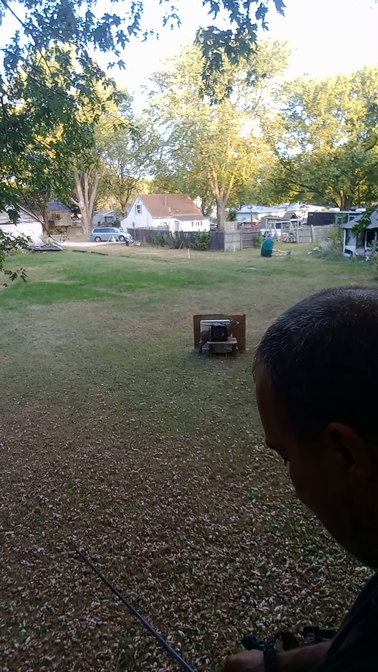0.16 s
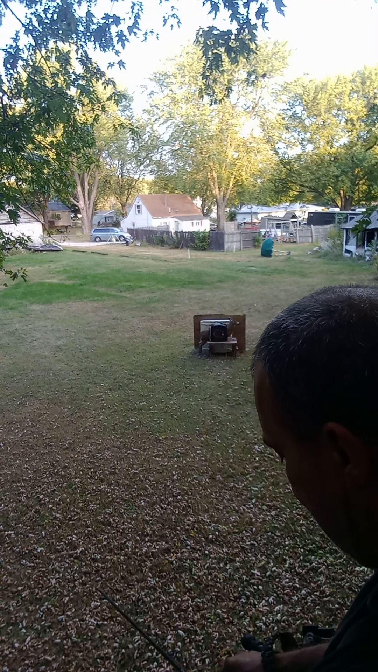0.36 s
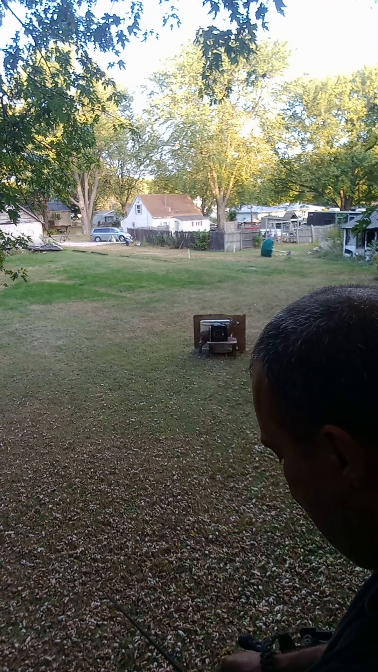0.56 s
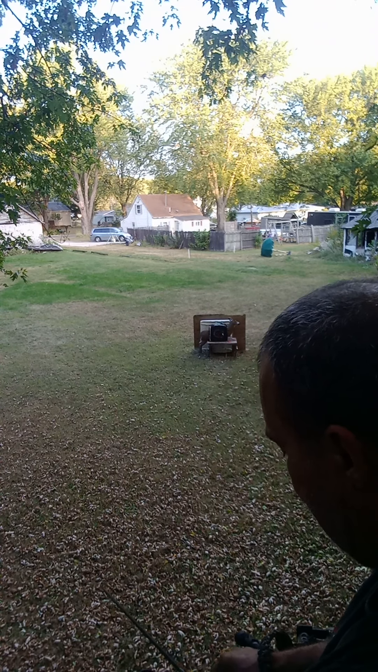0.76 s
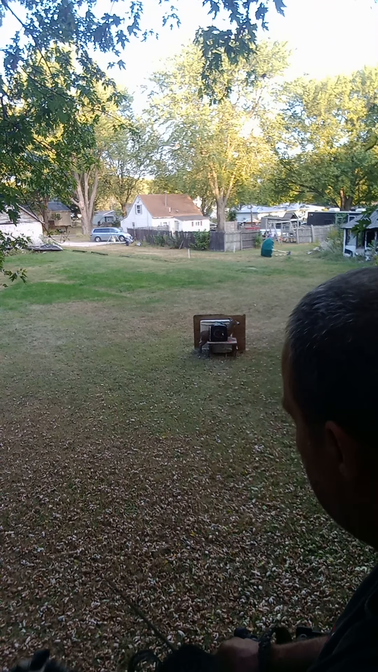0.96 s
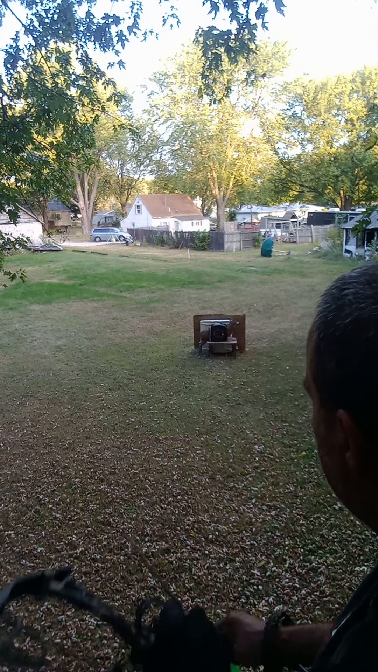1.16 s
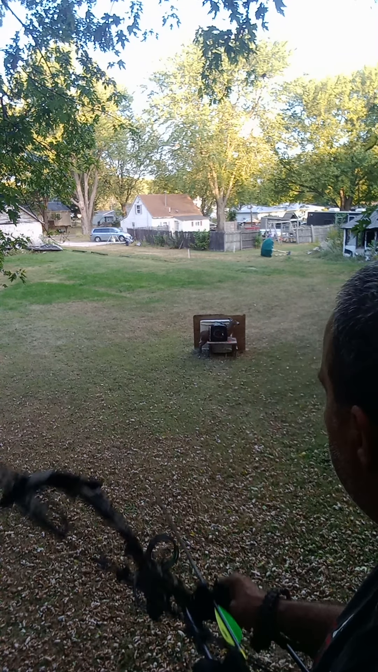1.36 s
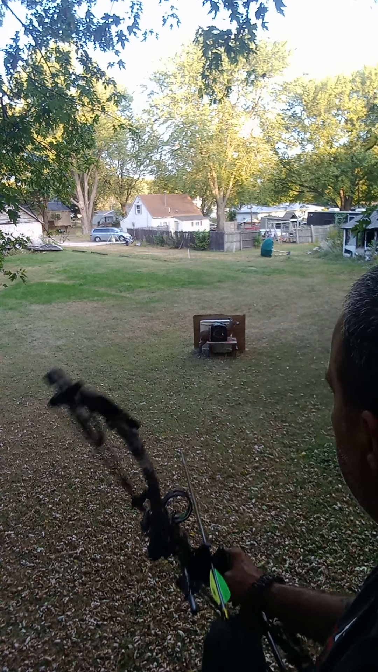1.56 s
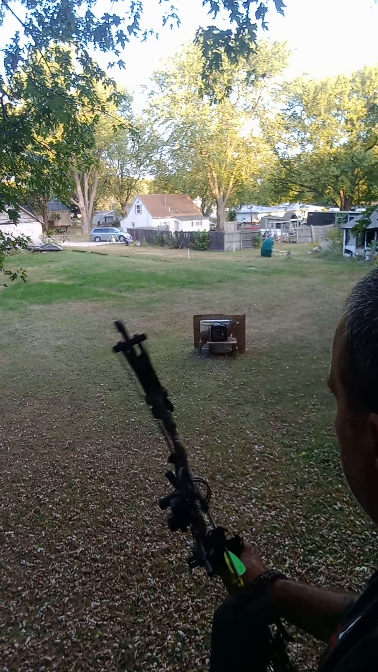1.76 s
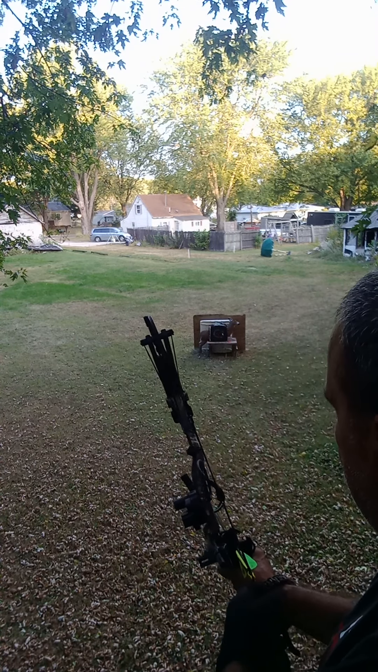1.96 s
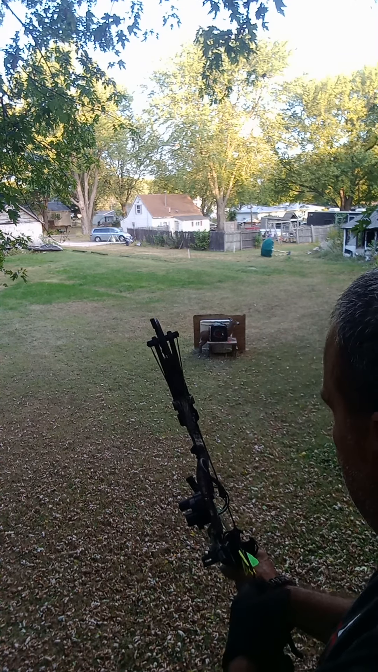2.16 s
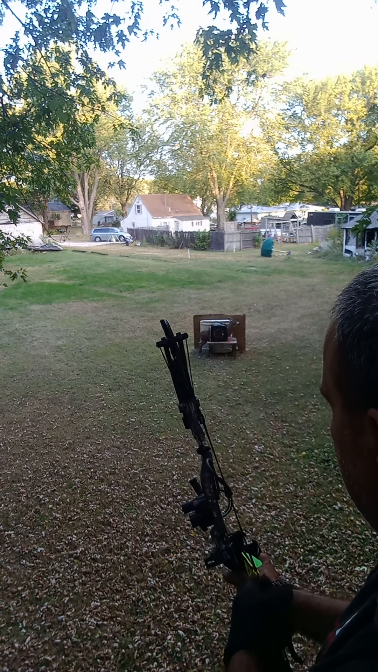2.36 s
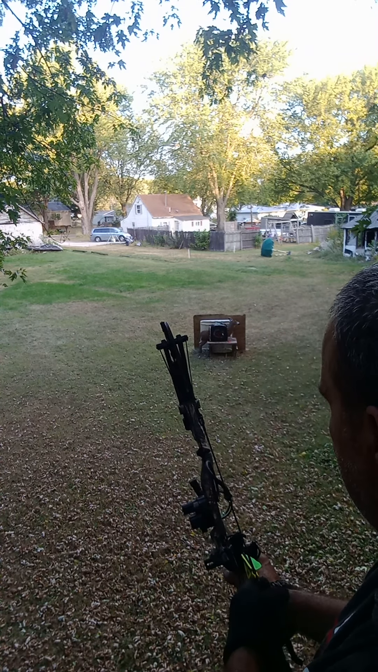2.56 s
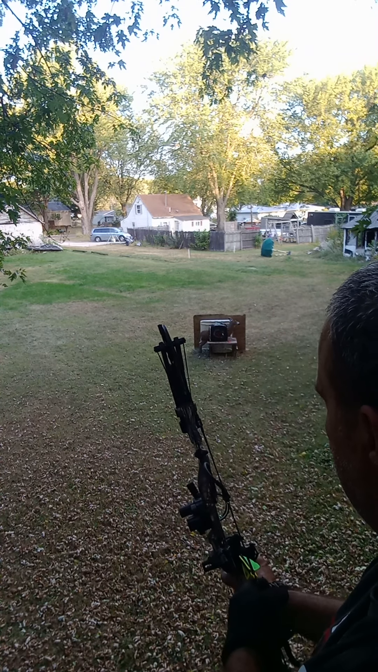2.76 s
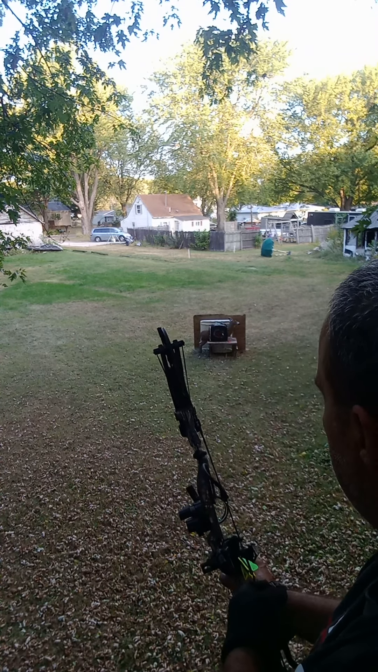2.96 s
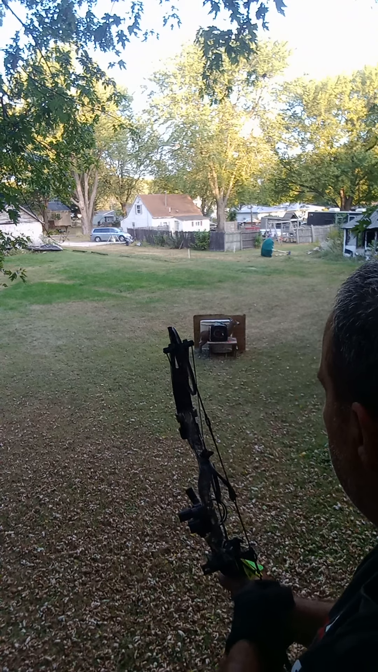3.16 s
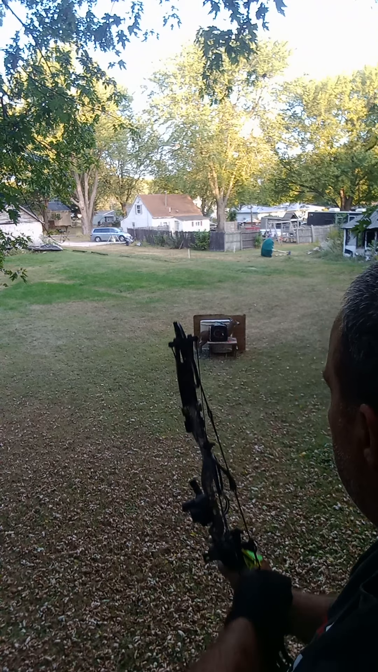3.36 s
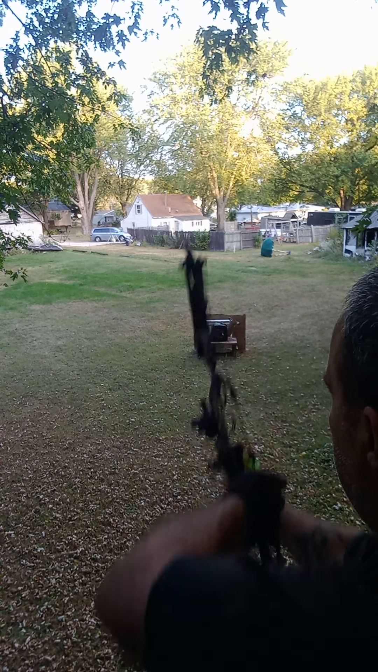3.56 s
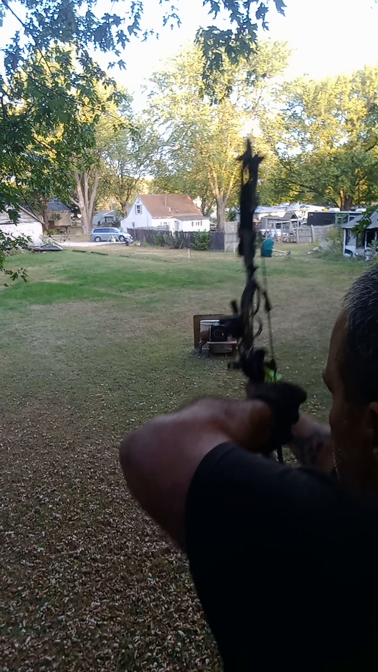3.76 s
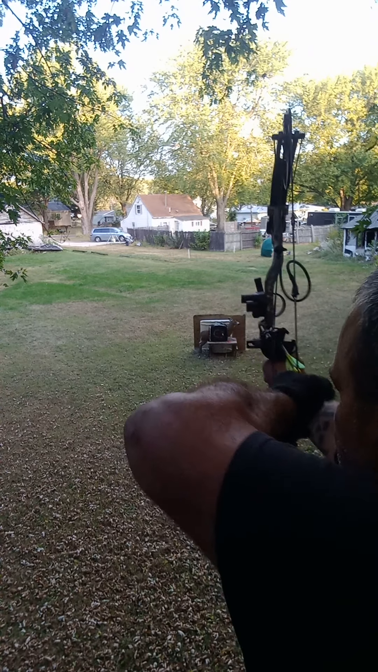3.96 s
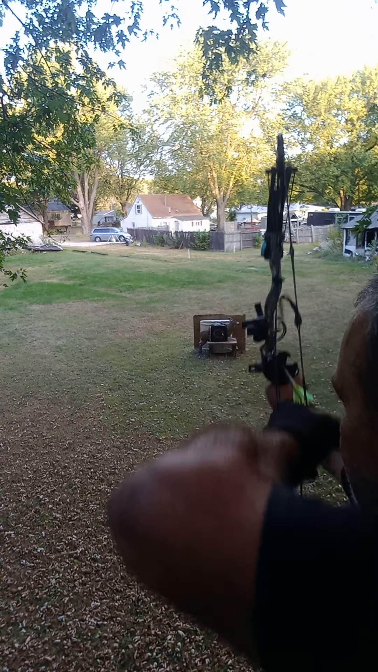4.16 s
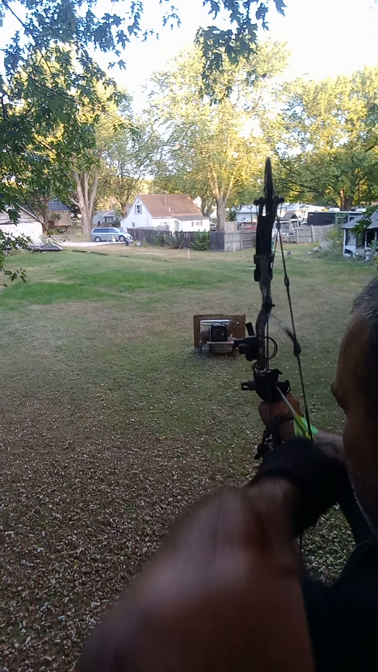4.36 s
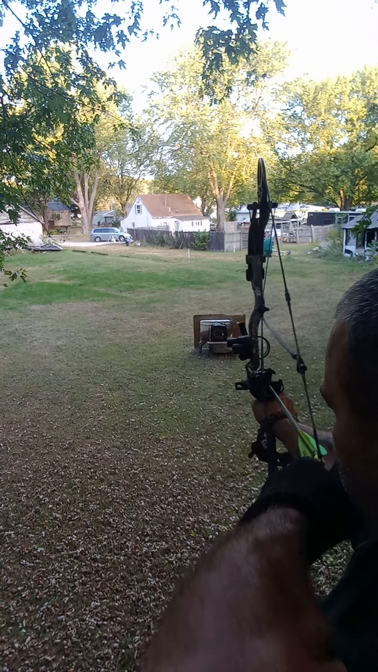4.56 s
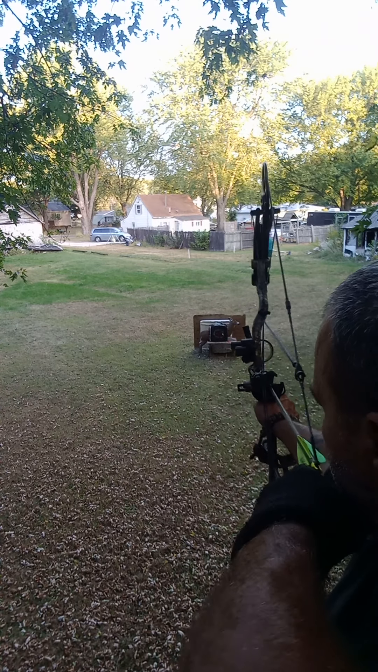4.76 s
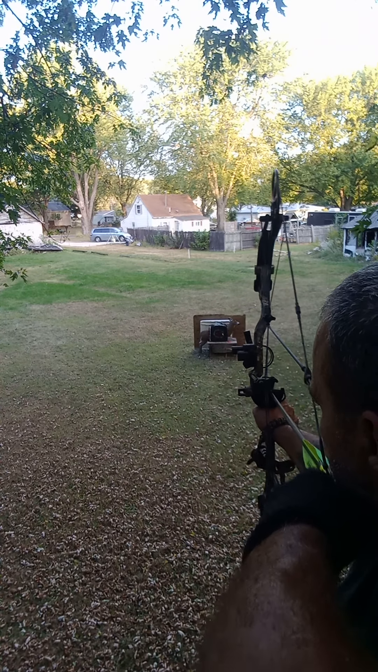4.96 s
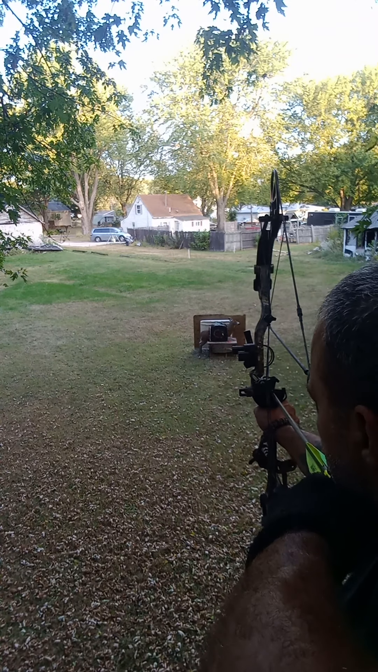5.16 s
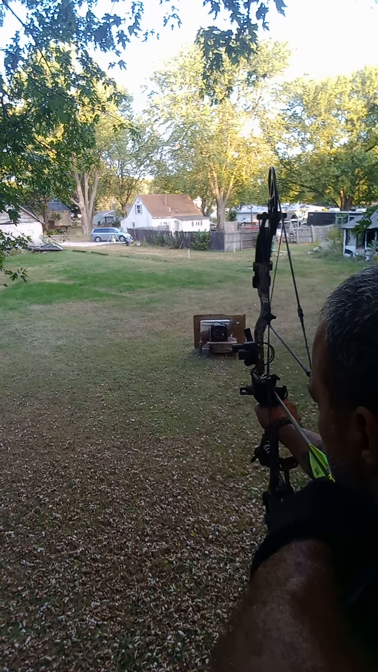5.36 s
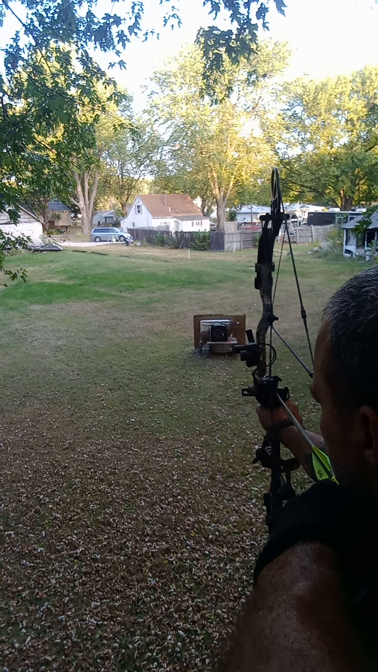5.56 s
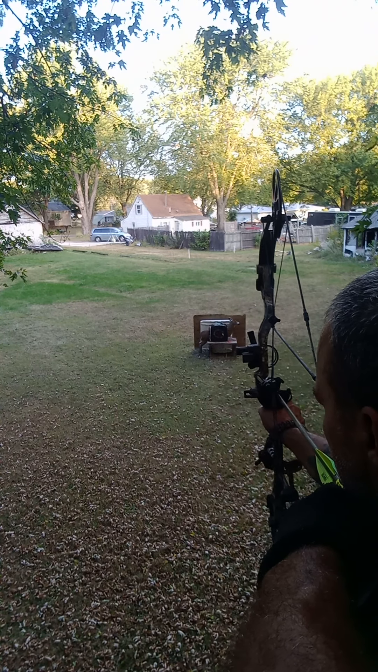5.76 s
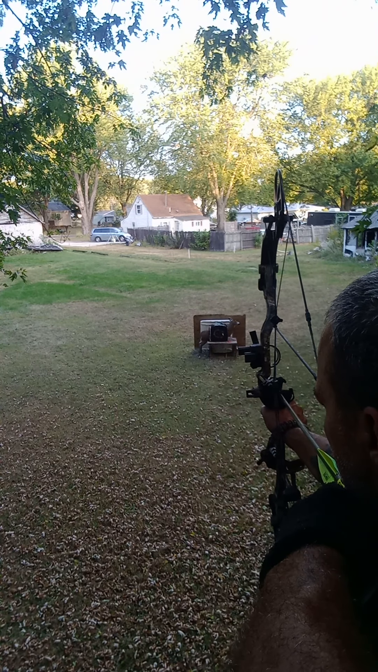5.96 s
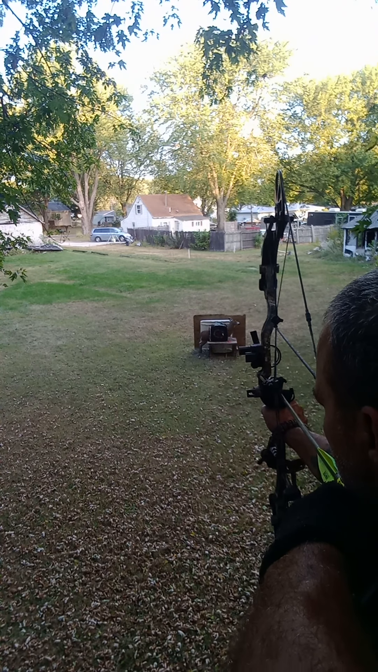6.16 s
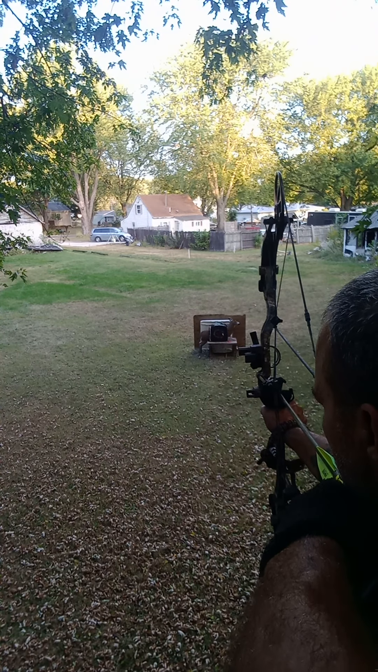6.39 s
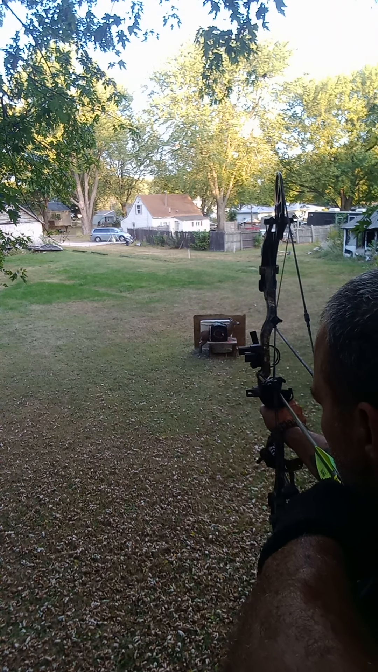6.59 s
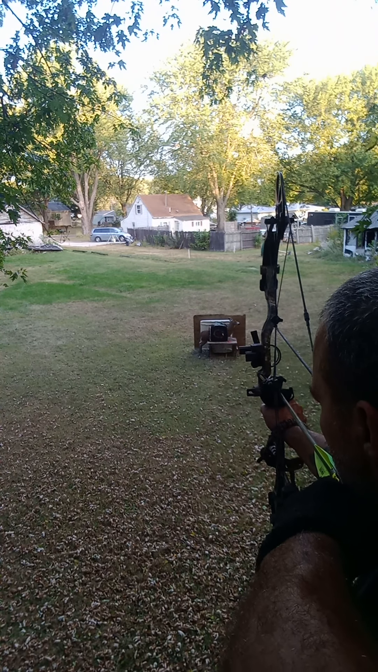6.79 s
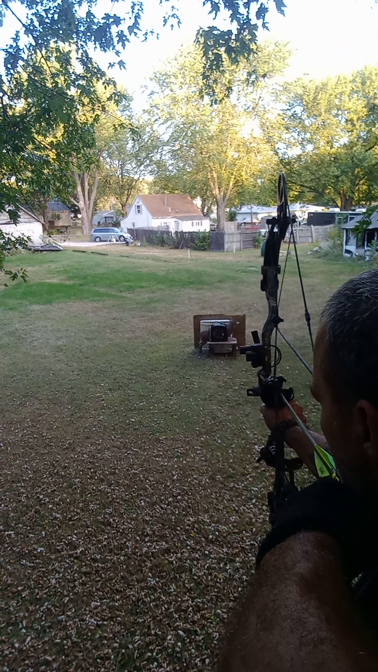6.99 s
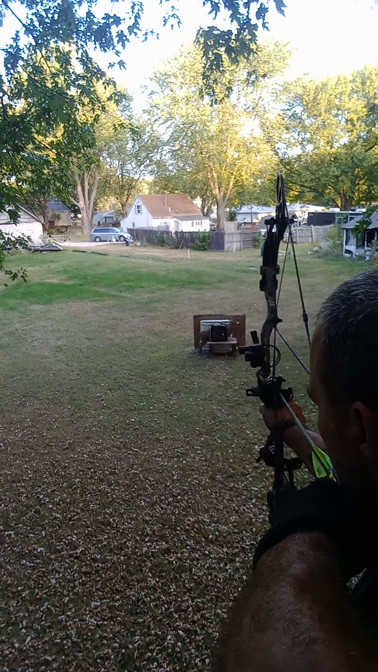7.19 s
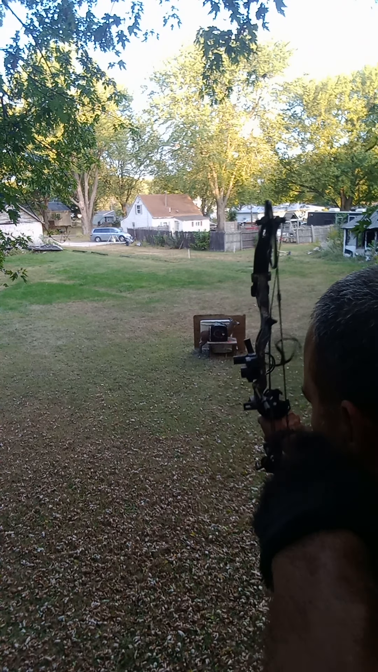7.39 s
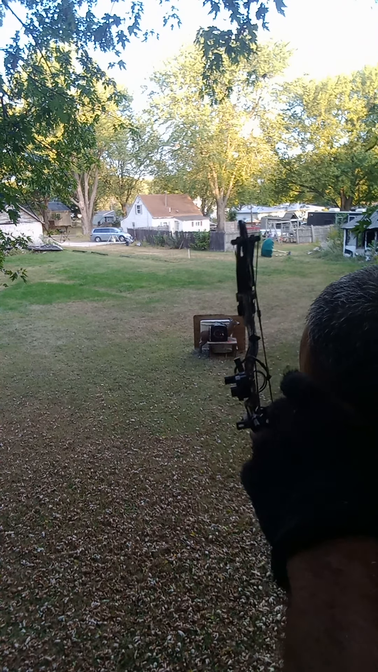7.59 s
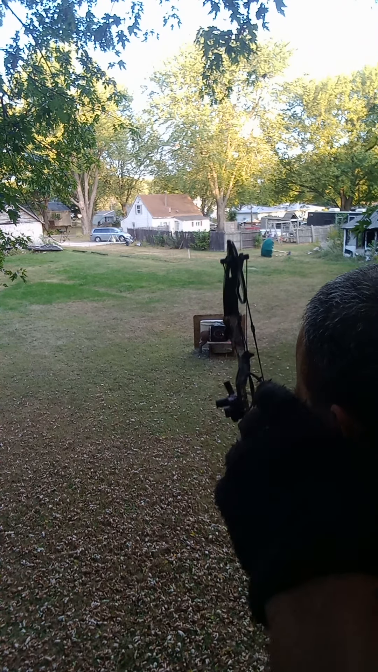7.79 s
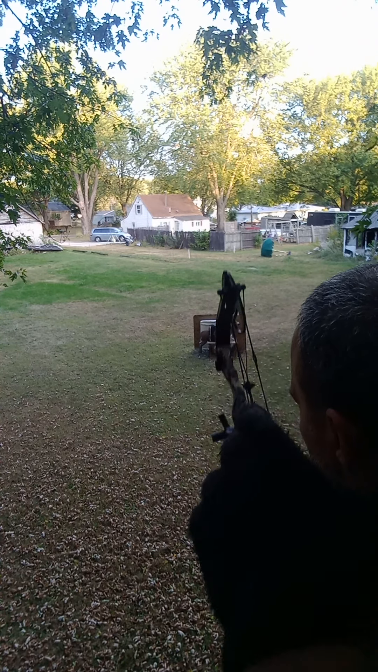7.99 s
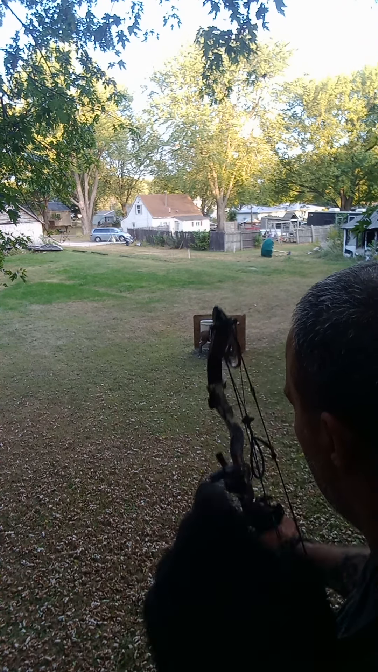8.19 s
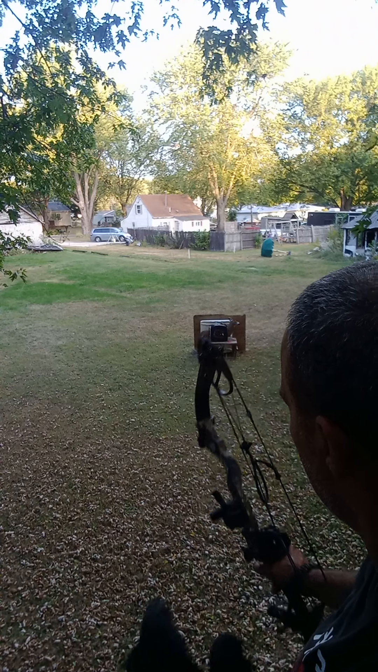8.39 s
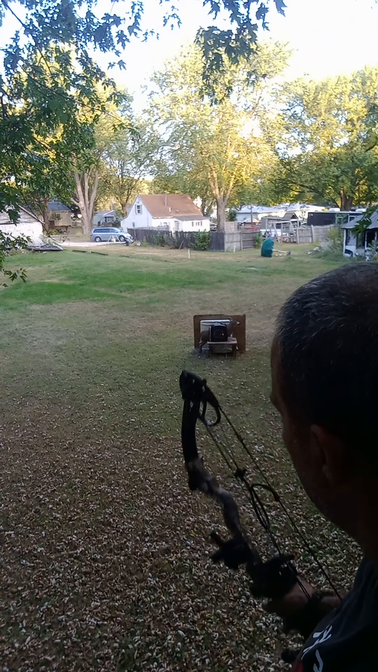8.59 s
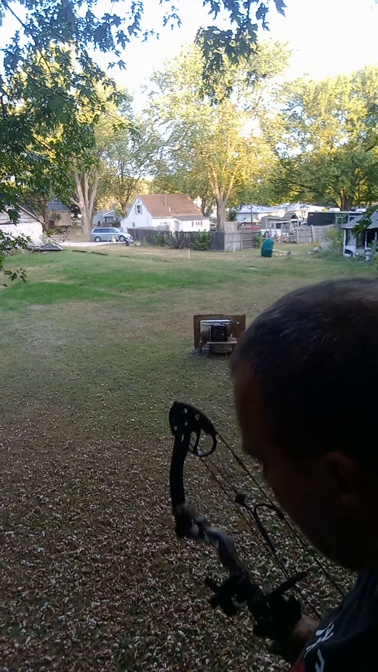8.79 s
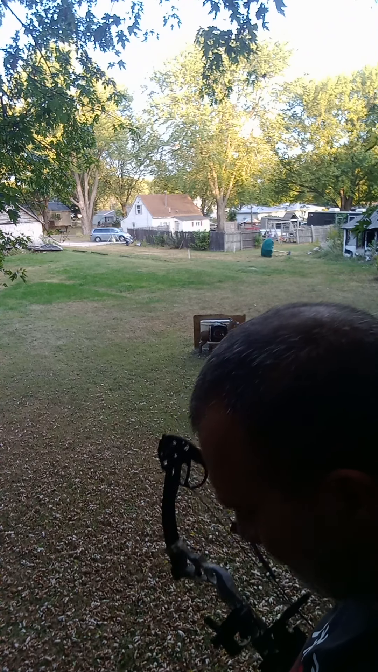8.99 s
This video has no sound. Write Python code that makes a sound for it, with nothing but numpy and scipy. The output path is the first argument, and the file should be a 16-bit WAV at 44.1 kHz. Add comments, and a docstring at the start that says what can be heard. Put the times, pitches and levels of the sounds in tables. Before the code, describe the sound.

Quiet backyard with far traffic, a throbbing engine drone and crickets; a bow snaps with a sharp buzzing slap, then an arrow thuds into a target.

```python
"""Far traffic, a throbbing engine drone and crickets open the scene and carry on beneath it: shaped noise and tones.
A faint rustle and a low rub, swells of noise, come before a compound bow is shot in a back yard: the string
whips forward, slaps its stop and leaves the bow buzzing, as noise bursts and damped modes.
A quarter of a second later the arrow thuds into a boxed target, more modes and noise; trees and houses answer
with quick echoes and decaying noise. Loud peaks turn the camera's gain down, and it stays down."""
import sys
import numpy as np
from scipy import signal
from scipy.fft import rfft, irfft, next_fast_len
from scipy.io import wavfile
from scipy.ndimage import uniform_filter1d, map_coordinates

SR = 44100
rng = np.random.default_rng(int(sys.argv[2]) if len(sys.argv) > 2 else 0)


def put_to_file(sound):
    """Save the sound as 16-bit audio at rate SR, in the file named by the first command-line argument."""
    columns = np.atleast_2d(sound).T  # one column per channel
    safe = np.clip(columns, -1, 1)
    whole_steps = np.round(safe * 32767)
    wavfile.write(sys.argv[1], SR, whole_steps.astype(np.int16))


N = 398663


def amp(db):
    """Decibels as an amplitude factor."""
    return 10 ** (np.asarray(db) / 20)


def unit(x):
    """x at rms 1."""
    return x / np.sqrt(np.mean(x ** 2) + 1e-20)


def along(points, hz):
    """A curve through (f/Hz, value) points, read on a log frequency axis."""
    f, v = np.transpose(points)
    return np.interp(np.log(hz + 1), np.log(f + 1), v)


def clock():
    """The time of each sample in seconds."""
    return np.arange(N) / SR


def curves(rows):
    """One value per sample for each column after the time."""
    s, *cols = np.transpose(rows)
    return [np.interp(clock(), s, c) for c in cols]


def wobble(rate):
    """A smooth random curve, rate knots a second."""
    knots = rng.standard_normal(int(N * rate / SR) + 4)
    return map_coordinates(knots, [clock() * rate])


def swell(middle, spread):
    """A bell-shaped rise and fall in time; spread is the bell's standard deviation in seconds."""
    return np.exp(-.5 * ((clock() - middle) / spread) ** 2)


def filtered(x, response):
    """x with its spectrum multiplied by a response of frequency."""
    m = next_fast_len(N + 8192)
    hz = np.fft.rfftfreq(m, 1 / SR)
    return irfft(rfft(x, m) * response(hz), m)[..., :N]


def panned(x, pan_db):
    """x leaning left by pan_db; a negative value leans right."""
    return x * amp([[pan_db / 2], [-pan_db / 2]])


def noise(colour, width, pan):
    """Stereo noise whose middle has rms 1, with a spectrum, a width and a balance."""
    def mid_and_side(hz):
        mid_db = along(colour, hz)
        return amp([mid_db, mid_db + along(width, hz)])

    mid, side = filtered(rng.standard_normal((2, N)), mid_and_side)
    left_right = np.array([mid + side, mid - side])
    pair = filtered(left_right, lambda hz: amp(np.outer([.5, -.5], along(pan, hz))))
    return pair / np.std(pair.mean(axis=0))


def fade(start, t60, rise):
    """The envelope of one blow: a quick rise and an exponential decay."""
    t = np.maximum(clock() - start, 0)
    return np.exp(-np.log(1000) * t / t60) * (1 - np.exp(-t / rise))


def ring(modes, start, scatter_db, rise):
    """Damped modes struck at start, each at a slightly random strength."""
    t = np.arange(SR // 2) / SR
    hz, db, t60 = np.transpose(modes)[:, :, None]
    strength = amp(db + scatter_db * rng.standard_normal(db.shape))
    partials = strength * np.exp(-np.log(1000) * t / t60) * np.sin(2 * np.pi * hz * t)
    struck = partials.sum(axis=0) * (1 - np.exp(-t / rise))
    return np.pad(struck, (round(start * SR), N))[:N]


def dying(x, start, decays, rise):
    """Scattered sound that builds up from start, each frequency dying at its own speed."""
    hz, t, z = signal.stft(x, SR, nperseg=256)
    t60 = along(decays, hz)[:, None]
    loss = np.exp(-np.log(1000) * np.maximum(t - start, 0) / t60)
    build_up = 1 - np.exp(-np.maximum(clock() - start, 0) / rise)
    return signal.istft(z * loss, SR, nperseg=256)[1][:, :N] * build_up


# cars passing on the far road: (middle t/s, spread t/s, rise in level/dB)
CAR_PASSES = [(.5, 0.93, 1.35), (5.95, 0.64, 2)]


def passing(lead):
    """The rise in dB as cars go by, lead seconds early."""
    return sum(db * swell(s - lead, spread) for s, spread, db in CAR_PASSES)


# spectrum of the tyres' roar: (f/Hz, relative level/dB per Hz)
ROAR_COLOUR = [(210, -30), (350, -4), (380, -12.5), (455, -6), (482, -8.5), (537, -0.5), (864, -6.5),
               (1070, -8), (1700, -19.5), (2770, -42), (3860, -46.5), (4350, -46), (6000, -43.5),
               (7800, -75), (13200, -120)]
# spectrum of the low rumble: (f/Hz, relative level/dB per Hz)
RUMBLE_COLOUR = [(22, -26), (40, -2), (60, 1), (100, 0), (150, -3.5), (300, -3), (420, -12.5), (700, -28),
                 (1500, -70)]
# stereo width of the background, heard in the rustle and rub too: (f/Hz, side minus mid level/dB)
AIR_SPREAD = [(60, -10), (110, -13.5), (200, -19.5), (380, -14.5), (700, -8.5), (1290, -3.5), (2380, -0.5),
              (4400, 1), (8120, -0.5), (15000, -0.5)]
# stereo balance of traffic and crickets: (f/Hz, left minus right level/dB)
AIR_BALANCE = [(60, -10.5), (110, -8.5), (200, -1.5), (380, -2), (700, -1), (1290, -0.5), (2380, -3.5),
               (4400, -4.5), (8120, 2.5), (15000, 0)]
ROAR_DB, ROAR_WAVERS_DB = -45.8, 0.42  # level between passes, and its unsteadiness
RUMBLE_DB, RUMBLE_FADE_DB_PER_S = -45.5, 0.35  # level at first, and how fast it recedes
RUMBLE_LEAD_S, RUMBLE_GROWS = 0.44, 1.6  # rumble comes before roar; its dB for each dB of the roar's rise


def traffic():
    """Distant roads: a low rumble under a soft roar of tyres, both swelling with each passing car."""
    roar_db = ROAR_DB + passing(0) + ROAR_WAVERS_DB * wobble(12)
    rumble_db = RUMBLE_DB - RUMBLE_FADE_DB_PER_S * clock()
    rumble_db = rumble_db + RUMBLE_GROWS * passing(RUMBLE_LEAD_S) + 0.5 * wobble(8)
    roar = amp(roar_db) * noise(ROAR_COLOUR, AIR_SPREAD, AIR_BALANCE)
    rumble = amp(rumble_db) * noise(RUMBLE_COLOUR, AIR_SPREAD, AIR_BALANCE)
    return roar + rumble


# far tyres singing: (middle t/s, spread t/s, f/Hz, level/dB before it wavers)
TYRE_NOTES = [(0.62, 0.59, 458, -52), (0.25, 0.55, 535, -50), (6.02, 0.52, 355, -54), (5.8, 0.47, 543, -48),
              (5.96, 0.71, 517, -51), (6.05, 0.57, 620, -50.5), (8.9, .35, 545, -52)]


def whines():
    """Tyres on the far road sing faint, unsteady sine notes that come and go."""
    notes = np.zeros(N)
    for s, spread, hz, db in TYRE_NOTES:
        pitch = hz * (1 + 0.00401 * wobble(3) + 0.00561 * wobble(25))
        level = amp(db + 2.1 * wobble(8)) * swell(s, spread)
        notes += level * np.sin(2 * np.pi * np.cumsum(pitch) / SR)
    return panned(notes, pan_db=-5.5)


# the far engine's drone, swelling and sinking: (t/s, level/dB before the tone's lift and the throb)
DRONE_LEVEL = [(0, -51.5), (0.4, -41), (1.35, -43), (1.7, -49.5), (2.4, -54), (3.3, -45), (4.45, -41),
               (4.8, -42), (6.2, -55.5), (6.9, -50), (8.2, -55.5)]
# rough running round the note: (f/Hz, relative level/dB per Hz)
CHURN_COLOUR = [(20, -70), (40, -30), (55, -11), (64, 5.5), (72, 5.5), (80, 4), (92, -9), (130, -35),
                (300, -120)]
HUM_HZ, HUM_DRIFT = 72.15, .005  # the note, and the share by which it wanders
CHURN_DB, CHURN_FADE_DB_PER_S = -42.5, 0.68  # level at first, before the throb, and how fast it recedes
CHURN_FOLLOWS = 0.34  # dB of churn for each dB of the drone
THROB_RATE, THROB_DEPTH = 11, .75  # random dips: knots a second, largest share of amplitude lost


def hum():
    """A far engine drones on one low note; its rough running beats against the note, and both throb."""
    level_db, = curves(DRONE_LEVEL)
    pitch = HUM_HZ * (1 + HUM_DRIFT * wobble(1.98))
    tone = amp(level_db + 3.5) * unit(np.sin(2 * np.pi * np.cumsum(pitch) / SR))
    churn_db = CHURN_DB - CHURN_FADE_DB_PER_S * clock()
    churn_db = churn_db + CHURN_FOLLOWS * (level_db - level_db.mean())
    churn = amp(churn_db) * noise(CHURN_COLOUR, AIR_SPREAD, [(72, -2)])
    throb = 1 - THROB_DEPTH * np.clip(wobble(THROB_RATE), 0, 1)
    return throb * (panned(tone, pan_db=-2.5) + churn)


# spectrum of the insect chorus: (f/Hz, relative level/dB per Hz)
CHORUS_COLOUR = [(2500, -31), (4000, -22), (5100, -14), (6000, -16), (6700, -8.5), (7300, 0), (8100, 0),
                 (8700, -8.5), (9300, -24), (10400, -19.5), (12000, -17), (13500, -14.5), (15300, -11.5)]
# the nearest cricket keeps a loose beat
FIRST_CHIRP_S, CHIRP_PERIOD_S, CHIRP_SCATTER_S = .397, .4296, .02
CHIRP_SPREAD_S, CHIRP_DB = 0.058, -76  # bell width of a chirp, and its typical level
CHIRP_VARIES_DB = 1.2  # change in level from chirp to chirp


def crickets():
    """A steady high chorus, and two nearer crickets whose chirps are trains of wing strokes."""
    chorus = amp(-65 + 1.0 * wobble(4.0)) * noise(CHORUS_COLOUR, AIR_SPREAD, AIR_BALANCE)
    stroke_hz = 55 + 3 * wobble(4)
    strokes = 1 + .5 * np.sin(2 * np.pi * np.cumsum(stroke_hz) / SR)

    chirps = np.zeros(N)
    for s in np.arange(FIRST_CHIRP_S, N / SR + CHIRP_SPREAD_S, CHIRP_PERIOD_S):
        louder, later = rng.standard_normal(2)
        chirps += amp(CHIRP_VARIES_DB * louder) * swell(s + CHIRP_SCATTER_S * later, CHIRP_SPREAD_S)
    wing_colour = [(3200, -40), (3950, -10), (4350, 1), (4750, -6), (5500, -30), (7000, -83)]
    nearest = amp(CHIRP_DB) * chirps * noise(wing_colour, AIR_SPREAD, AIR_BALANCE)

    # the second cricket is fainter and higher, at about 2.1 chirps a second
    slow_chirps = np.sin(np.pi * np.cumsum(2.1 + 0.26 * wobble(0.99)) / SR) ** 2
    high_colour = [(4200, -50), (4750, -8), (5050, -4), (5350, -7), (6200, -60)]
    second = amp(-81.5) * slow_chirps * noise(high_colour, AIR_SPREAD, AIR_BALANCE)
    return chorus + strokes * (nearest + second)


# small sharp ticks: (t/s, level/dB, t60/s)
TICK_HITS = [(.046, -36, 0.022), (1.675, -54, .03), (7.546, -30, 0.052)]
# spectrum of the ticks: (f/Hz, relative level/dB per Hz)
TICK_SPECTRUM = [(300, 5), (900, 9.5), (2000, -2), (2900, -8), (3800, -3), (5500, -13), (7000, 1.5),
                 (10000, -26), (15000, -14.5)]
# stereo width of the ticks and of the bow's rattle: (f/Hz, side minus mid level/dB)
BOW_SPREAD = [(60, -10), (110, -13), (200, -13.5), (380, -4), (700, -4), (1290, 0), (2380, 1), (4400, 0.5),
              (8120, 0), (15000, -2)]


def ticks():
    """Brief dry bursts of noise, each with a faint tail."""
    level = np.zeros(N)
    for s, db, t60 in TICK_HITS:
        tail = amp(-17.0) * fade(s, t60=0.26, rise=.003)
        level += amp(db) * (fade(s, t60, rise=.0003) + tail)
    return level * noise(TICK_SPECTRUM, BOW_SPREAD, [(1000, 0)])


def draw():
    """Sleeve and cables rustle faintly, as grainy noise, while the string is pulled back."""
    grain = unit(amp(2.5 * wobble(140)))
    colour = [(800, -30), (2500, -3), (4000, -5.0), (6500, 0), (9500, -15), (15000, -3)]
    return amp(-70) * swell(4.38, .18) * grain * noise(colour, AIR_SPREAD, [(1000, 0)])


def rub():
    """A dull low rub with a hollow note in it swells briefly as the archer settles at full draw."""
    dull_colour = [(60, -19), (130, -3), (220, -4), (330, -3), (420, -12.0), (900, -21), (3000, -120)]
    dull = swell(4.87, 0.066) * noise(dull_colour, AIR_SPREAD, [(300, 0)])
    hollow_colour = [(60, -120), (200, -56), (275, -14), (303, -1), (335, -13), (450, -66), (900, -120)]
    hollow = swell(4.82, 0.098) * noise(hollow_colour, AIR_SPREAD, [(300, 0)])
    return amp(-36.5) * dull + amp(-39.5) * hollow


# string, cams and fittings striking: (t/s, level/dB, t60/s)
SLAP_HITS = [(7.2985, -37.5, .03), (7.3022, -32, .05), (7.3105, -16.5, .02), (7.313, -12.5, 0.033),
             (7.3169, -12.5, 0.032), (7.3205, -19.5, 0.046), (7.3285, -30, 0.045)]
# spectrum of the slaps: (f/Hz, relative level/dB per Hz)
SLAP_SPECTRUM = [(88, -30), (150, -1.5), (1040, -4), (1270, -11), (1450, -4), (1700, -20), (2060, -11),
                 (3760, -13.5), (5760, -12), (8490, -12), (9730, -19.5), (13800, -12.5), (15500, -18)]
# stereo balance of the slaps: (f/Hz, left minus right level/dB)
BOW_BALANCE = [(60, -3.0), (110, -4), (200, -3), (380, 2), (700, -4), (1290, -4), (2380, 2), (4400, -3.5),
               (8120, 0.5), (15000, -1)]
# modes of riser, string and fittings: (f/Hz, level/dB before random scatter, t60/s)
BOW_MODES = [(197, -21, 0.076), (333, -16.5, 0.094), (441, -24.5, .18), (526, -26, 0.17),
             (583, -25.5, 0.22), (750, -22.5, 0.069), (995, -17, 0.033), (1454, -29, .06), (2114, -23, .08),
             (2190, -36, 0.17), (3300, -37, 0.2), (4170, -51, .18), (4490, -39, .11), (7230, -35, 0.17)]
# the limbs' low flex: (f/Hz, level/dB relative to each kick, t60/s)
LIMB_MODES = [(73, -26, 0.1), (91, -16, 0.11), (112, -31, 0.054)]
# the limbs' recoil and rebound: (t/s, level/dB)
LIMB_KICKS = [(7.3183, 0.5), (7.386, -12.5)]
# scatter round the archer: (f/Hz, t60/s)
NEAR_DECAY = [(100, 0.16), (500, 0.22), (2000, 0.17), (8000, 0.25), (14000, .19)]
# far scatter of the yard, for bow and thud alike: (f/Hz, t60/s)
YARD_DECAY = [(100, .6), (500, 0.65), (1500, 0.92), (3500, 0.96), (7000, .65), (13000, .45)]
# stereo width of the string's swish and the yard's answer: (f/Hz, side minus mid level/dB)
ECHO_SPREAD = [(60, -13), (110, -19), (200, -19), (380, -12), (700, -8), (1290, 0), (2380, 0), (4400, 1),
               (8120, 0.5), (15000, 2)]


def bow():
    """The string swishes forward and slaps its stop in a burst of rattles; the limbs recoil and the riser rings on."""
    swish_level = amp(np.interp(clock(), [7.288, 7.2995, 7.310, 7.318], [-120, -28, -30, -120]))
    swish_colour = [(150, -12), (450, 5), (1000, 0), (1800, -21), (7000, -21), (15000, -37)]
    swish = swish_level * noise(swish_colour, ECHO_SPREAD, [(1000, -1)])

    # the slaps overlap, so their powers add
    rattle_power = sum((amp(db) * fade(s, t60, rise=0.00083)) ** 2 for s, db, t60 in SLAP_HITS)
    crack = np.sqrt(rattle_power) * noise(SLAP_SPECTRUM, BOW_SPREAD, BOW_BALANCE)
    body = panned(ring(BOW_MODES, start=7.3111, scatter_db=3.5, rise=0.00079), pan_db=-2)
    flex = sum(amp(db) * ring(LIMB_MODES, start=s, scatter_db=.5, rise=0.0047) for s, db in LIMB_KICKS)
    recoil = panned(flex, pan_db=-3.0)

    near_noise = noise(SLAP_SPECTRUM, BOW_SPREAD, BOW_BALANCE)
    near = amp(-25.0) * dying(near_noise, 7.318, NEAR_DECAY, rise=0.0048)
    far_noise = noise(SLAP_SPECTRUM, BOW_SPREAD, BOW_BALANCE)
    far = amp(-46) * dying(far_noise, 7.33, YARD_DECAY, rise=.02)
    return swish + crack + body + recoil + near + far


# the arrow's thud and its quick echoes: (t/s, level/dB)
THUD_HITS = [(7.559, -1), (7.5668, -6), (7.575, -17.5), (7.5991, -13.5), (7.6263, -24)]
# modes of the target and its frame: (f/Hz, level/dB relative to each thud or echo, t60/s)
TARGET_MODES = [(86, -26, .13), (106.4, -12.5, 0.17), (127.6, -22.5, 0.2), (157.6, -14, 0.14),
                (207, -13.5, 0.13), (253, -19.5, 0.13), (307, -21, 0.095), (388.5, -14.5, 0.089),
                (560, -26, 0.035), (636, -20, 0.053), (695, -12.5, 0.055), (945, -14, 0.038),
                (1223, -18, 0.038), (1375, -16, 0.039), (1466, -18.5, 0.056), (2030, -26, .04)]
# spectrum of the point tearing in: (f/Hz, relative level/dB per Hz)
CRUNCH_COLOUR = [(180, -26), (300, 1), (417, -1.5), (808, -4), (968, -1.5), (1700, -22), (2830, -18),
                 (3870, -27.5), (6900, -35.5), (9290, -46.5), (15500, -46)]
# spectrum of the yard's answer to the thud: (f/Hz, relative level/dB per Hz)
ECHO_COLOUR = [(47, -31), (80, -3), (133, -8.5), (225, -5), (263, -3), (446, -9.5), (709, -8), (774, -8.5),
               (1400, -15), (4220, -23.5), (6860, -25.5), (9340, -39), (15500, -42.5)]
# spectrum of the low roll off walls and trees: (f/Hz, relative level/dB per Hz)
BOOM_COLOUR = [(35, -24.5), (70, -1), (130, -1), (300, -6), (450, -15), (900, -35), (2500, -91)]


def target():
    """The arrow punches in, the target booms, with quick echoes, and the yard scatters the thud."""
    # the point meets the face first
    face = [mode for mode in TARGET_MODES if 500 < mode[0] < 1300]
    entry = amp(-12) * ring(face, start=7.5515, scatter_db=3, rise=.001)
    thud = sum(amp(db) * ring(TARGET_MODES, start=s, scatter_db=3.0, rise=0.00064) for s, db in THUD_HITS)

    # the crunch starts a millisecond before the thud and before each echo
    tearing = sum(amp(db) * fade(s - .001, t60=0.034, rise=0.00045) for s, db in THUD_HITS)
    crunch_width = [(500, -22), (2000, -8), (6000, -7.5)]
    crunch = amp(-5.5) * tearing * noise(CRUNCH_COLOUR, crunch_width, [(1000, -0.88)])

    early_noise = noise(ECHO_COLOUR, ECHO_SPREAD, [(1000, -1.2)])
    early_decay = [(100, 0.36), (1000, 0.31), (8000, 0.36)]
    early = amp(-20.5) * dying(early_noise, 7.562, early_decay, rise=0.013)
    late_noise = noise(ECHO_COLOUR, ECHO_SPREAD, [(1000, -1.5)])
    late = amp(-27.5) * dying(late_noise, 7.58, YARD_DECAY, rise=0.023)
    boom_level = amp(-26.5) * fade(7.585, t60=0.68, rise=0.012)
    boom = boom_level * noise(BOOM_COLOUR, ECHO_SPREAD, [(200, -1.5)])
    clumps = amp(1.9 * wobble(110))  # uneven level, as single trunks and walls answer one after another
    return panned(entry + thud, pan_db=-3.5) + crunch + clumps * (early + late) + boom


def scene():
    """The background, the draw, the shot and the hit, summed."""
    background = traffic() + whines() + hum() + crickets()
    return background + ticks() + draw() + rub() + bow() + target()


def gain_control(x, threshold_db, depth):
    """Each new loudest moment above the threshold turns the gain down smoothly, and it stays down."""
    power = np.abs(uniform_filter1d(np.mean(x ** 2, axis=0), 512))  # abs guards against rounding below zero
    level_db = 20 * np.log10(np.sqrt(power) + 1e-9)
    over_db = np.maximum(level_db - threshold_db, 0)
    duck_db = np.maximum.accumulate(depth * over_db)
    smooth_db = signal.lfilter([1 / 2048], [1, 1 / 2048 - 1], duck_db)
    return x * amp(-smooth_db)


TOP_HZ = 15780  # band limit


def record(dry):
    """The camera cuts deep bass, lowers its gain, rounds the highest peaks and keeps nothing above its band limit."""
    bass_cut = signal.butter(2, 50, 'highpass', fs=SR, output='sos')
    x = signal.sosfilt(bass_cut, dry)
    x = gain_control(x, threshold_db=-15.5, depth=0.51)
    x = x / (1 + np.abs(x) ** 8) ** (1 / 8)
    return filtered(x, lambda hz: hz < TOP_HZ)


dry = scene()
out = record(dry)
put_to_file(out)
```